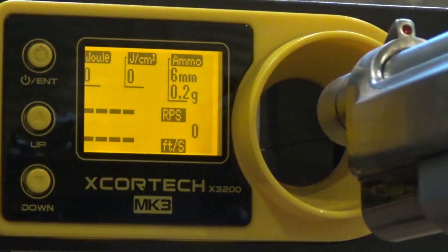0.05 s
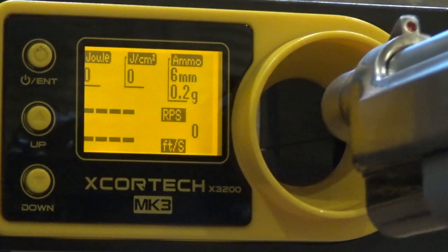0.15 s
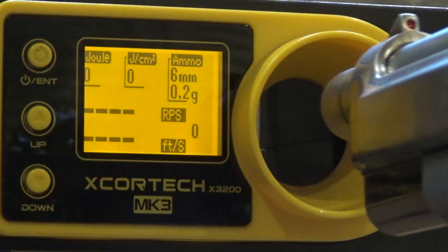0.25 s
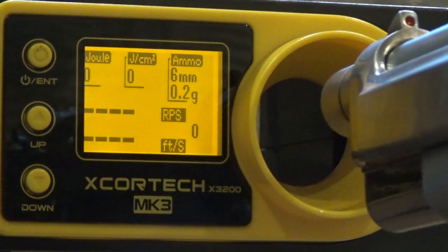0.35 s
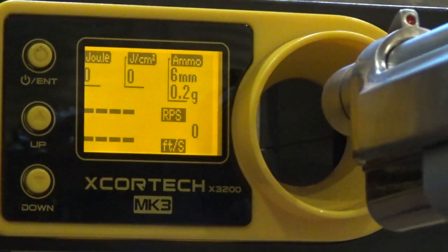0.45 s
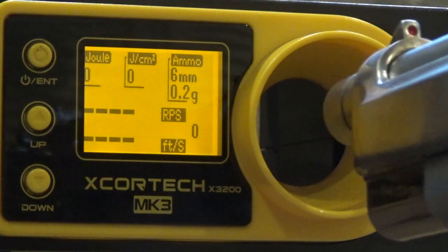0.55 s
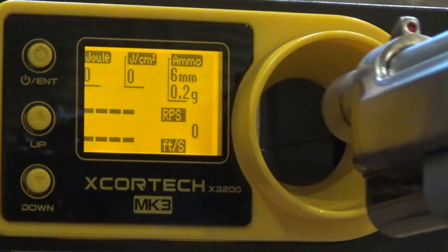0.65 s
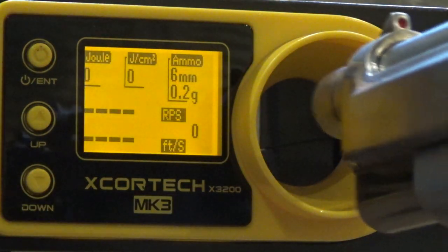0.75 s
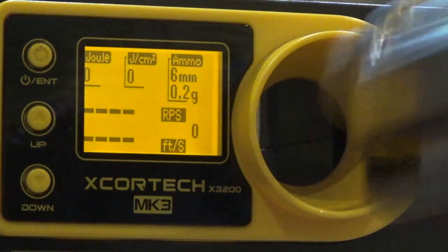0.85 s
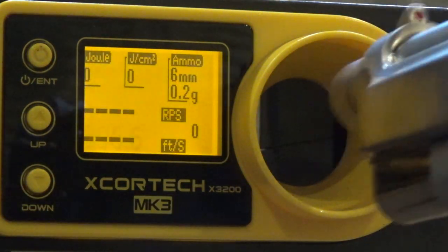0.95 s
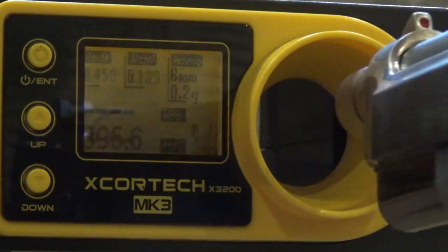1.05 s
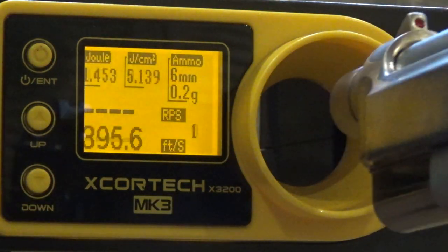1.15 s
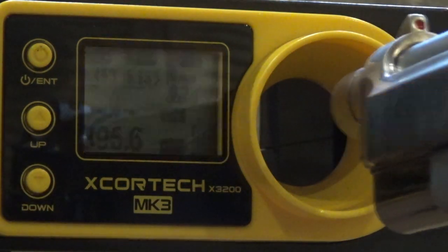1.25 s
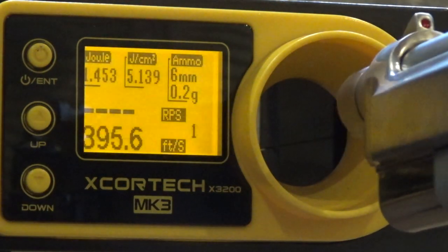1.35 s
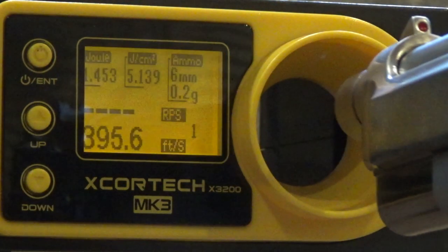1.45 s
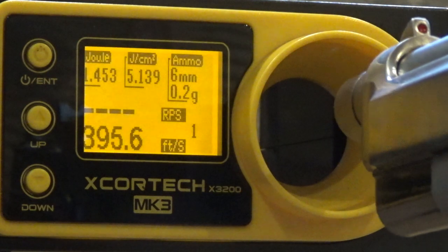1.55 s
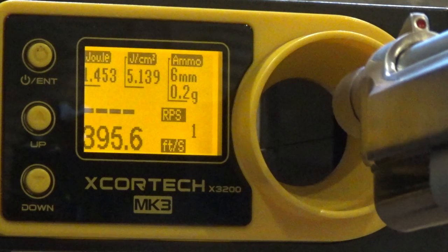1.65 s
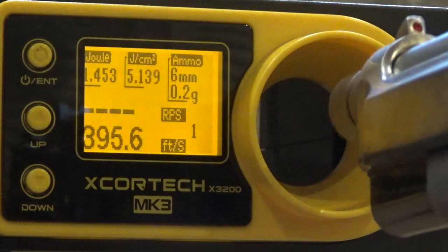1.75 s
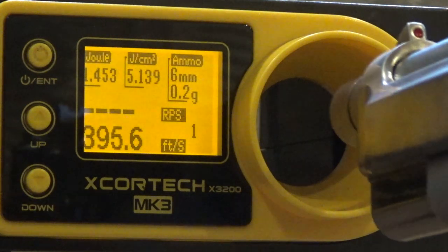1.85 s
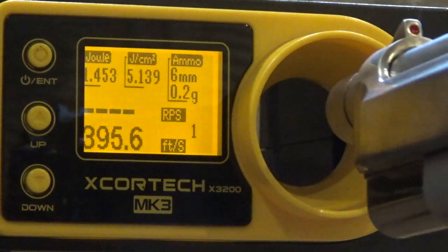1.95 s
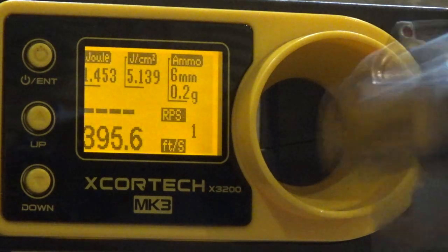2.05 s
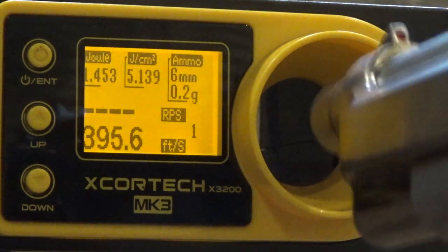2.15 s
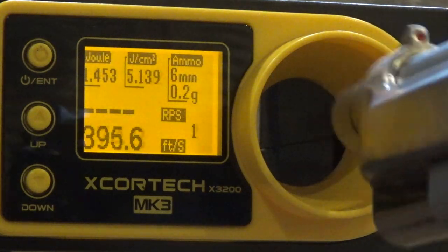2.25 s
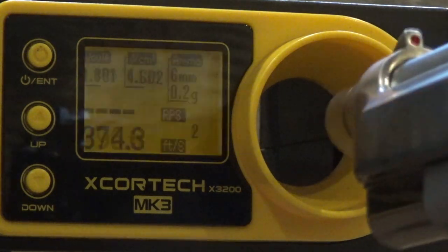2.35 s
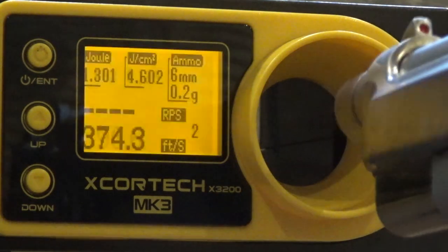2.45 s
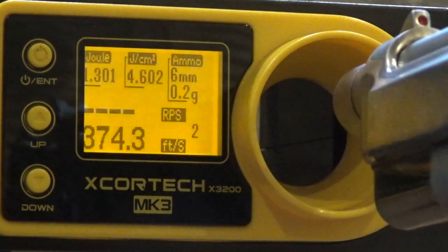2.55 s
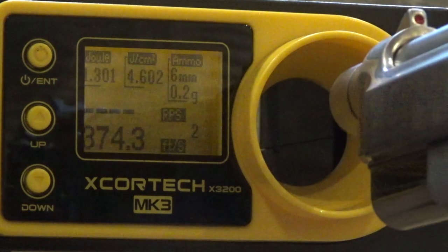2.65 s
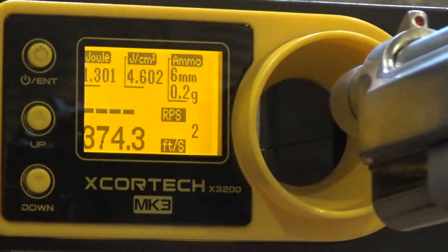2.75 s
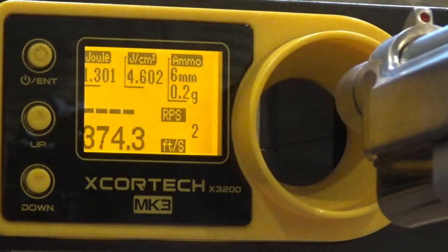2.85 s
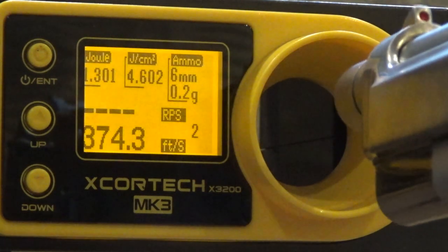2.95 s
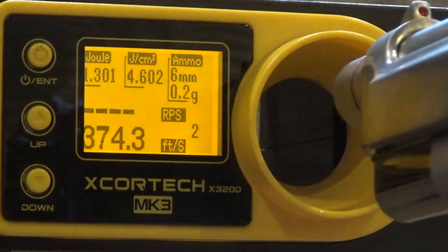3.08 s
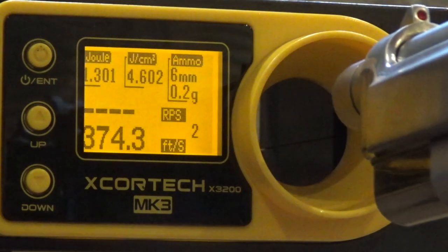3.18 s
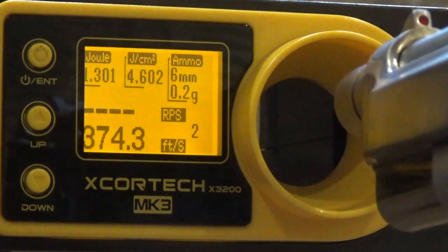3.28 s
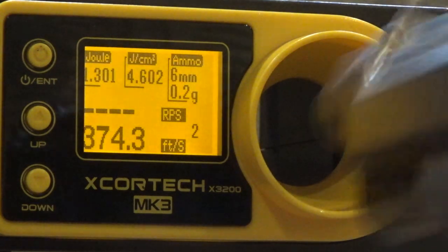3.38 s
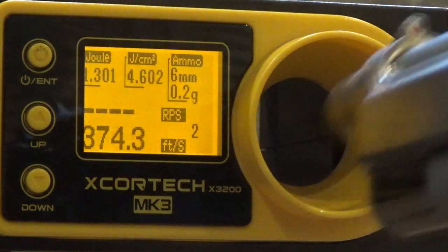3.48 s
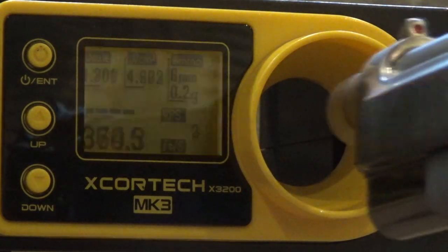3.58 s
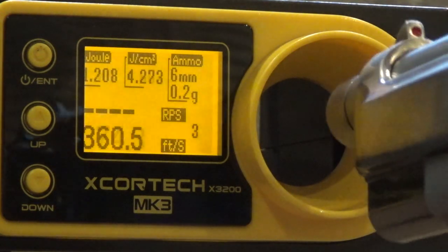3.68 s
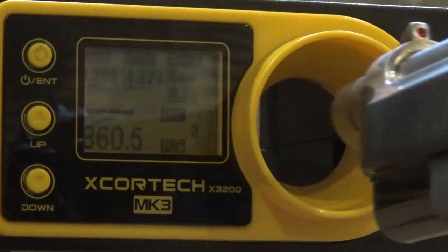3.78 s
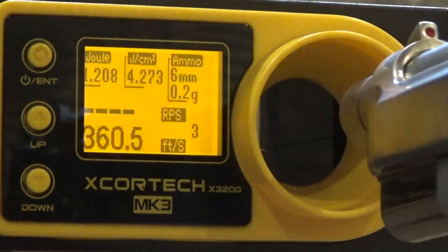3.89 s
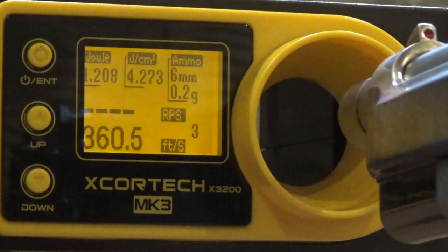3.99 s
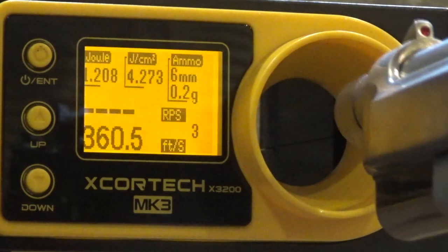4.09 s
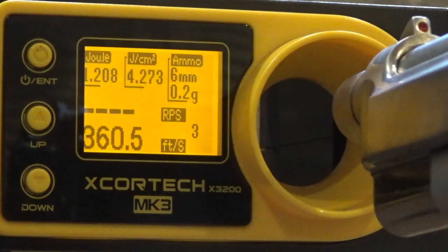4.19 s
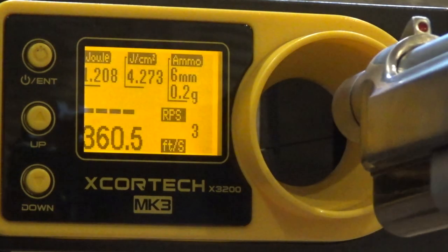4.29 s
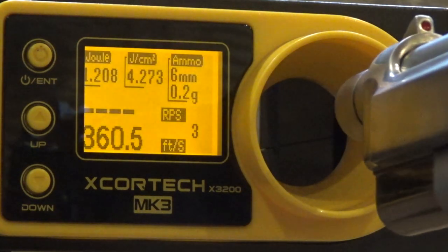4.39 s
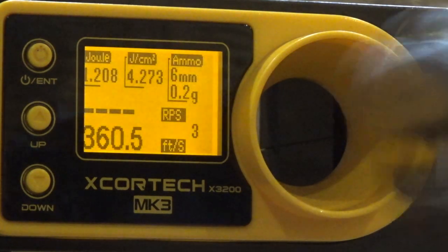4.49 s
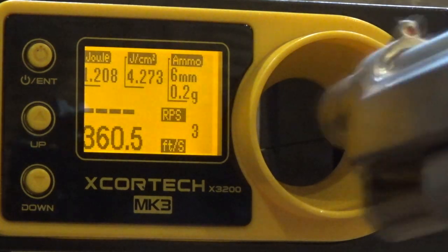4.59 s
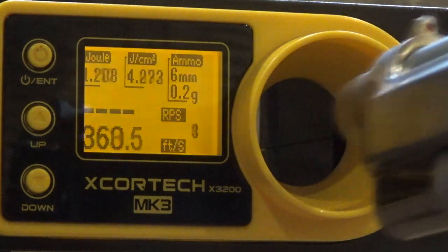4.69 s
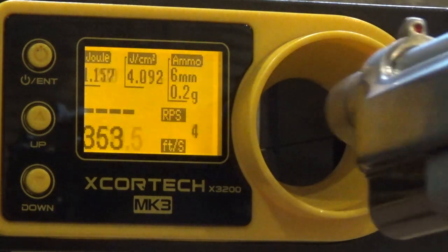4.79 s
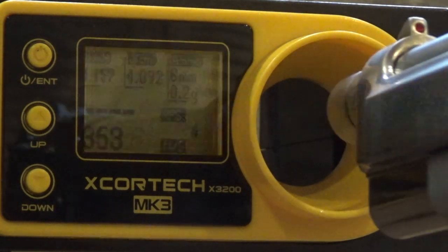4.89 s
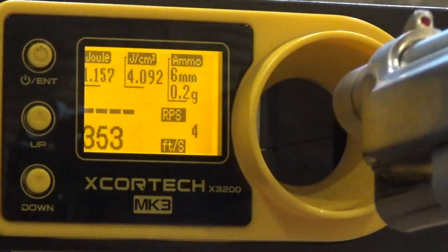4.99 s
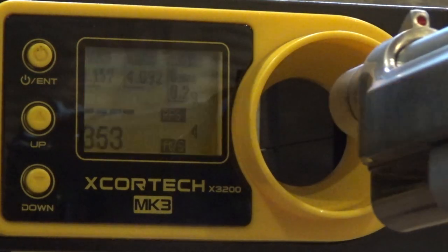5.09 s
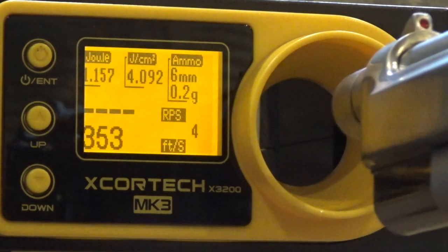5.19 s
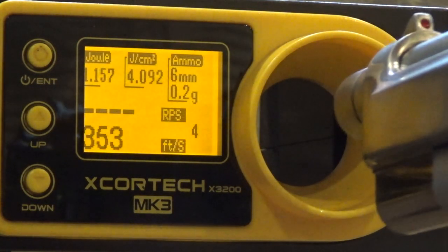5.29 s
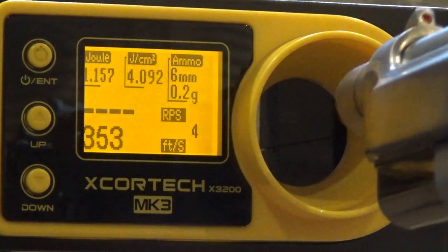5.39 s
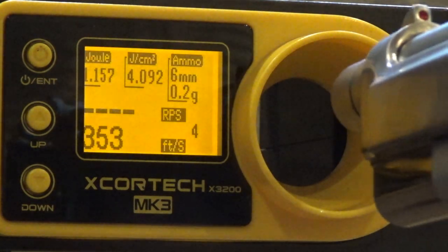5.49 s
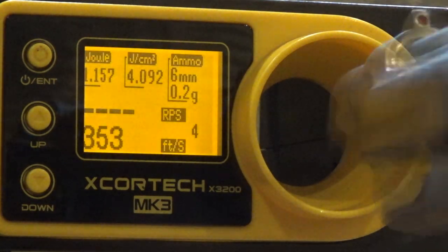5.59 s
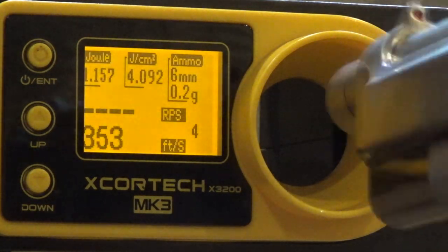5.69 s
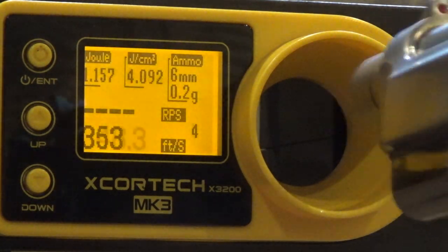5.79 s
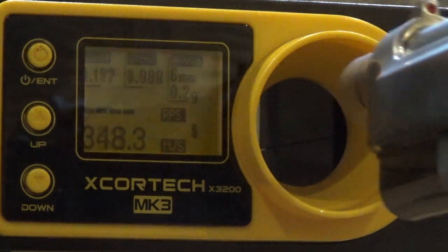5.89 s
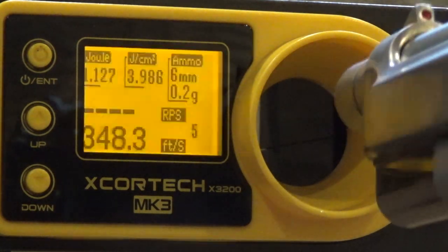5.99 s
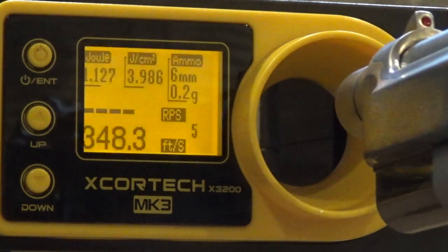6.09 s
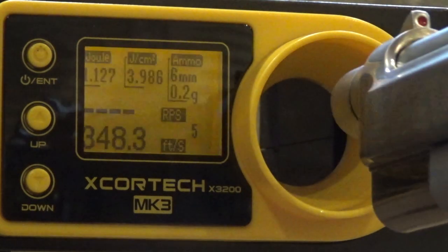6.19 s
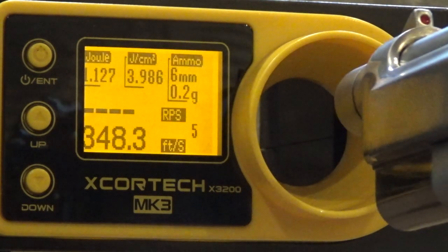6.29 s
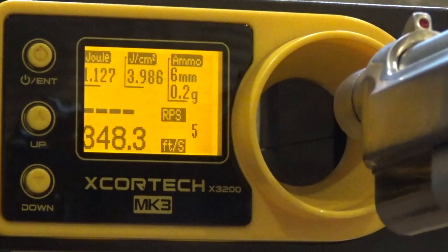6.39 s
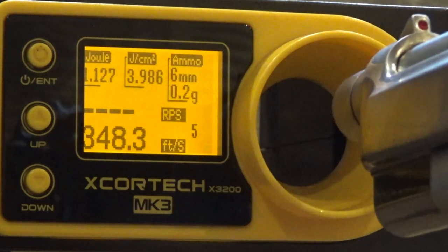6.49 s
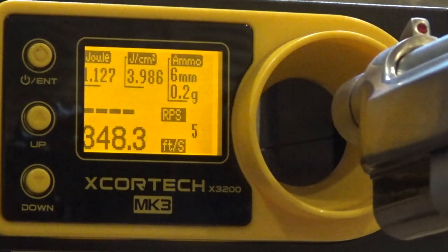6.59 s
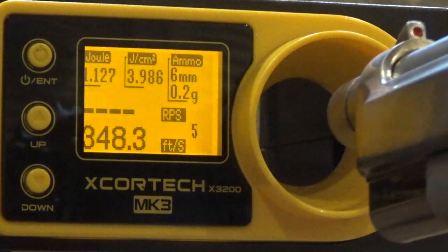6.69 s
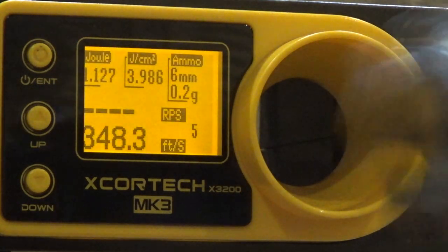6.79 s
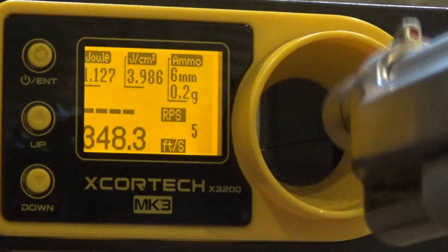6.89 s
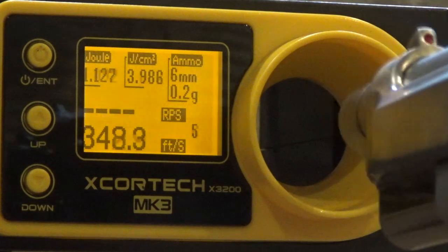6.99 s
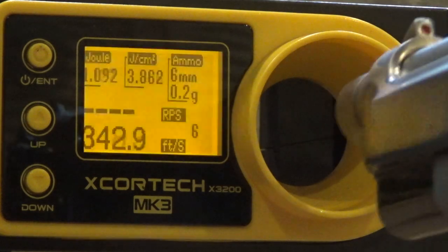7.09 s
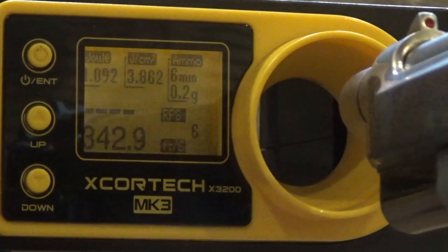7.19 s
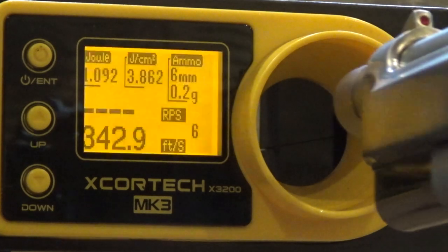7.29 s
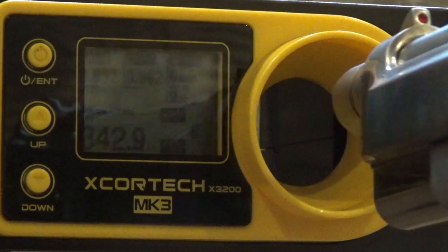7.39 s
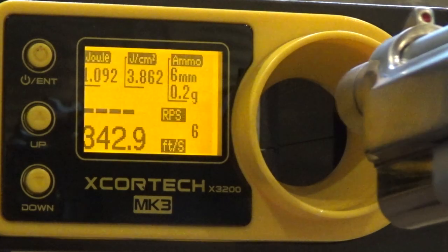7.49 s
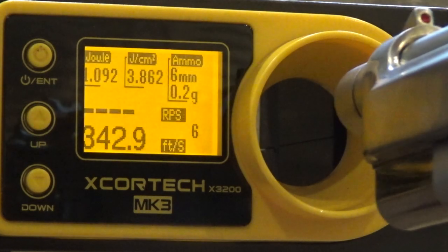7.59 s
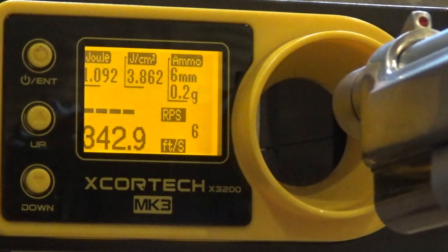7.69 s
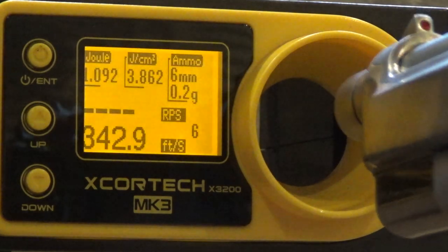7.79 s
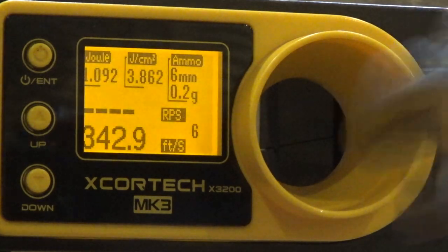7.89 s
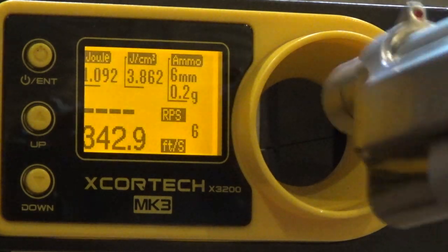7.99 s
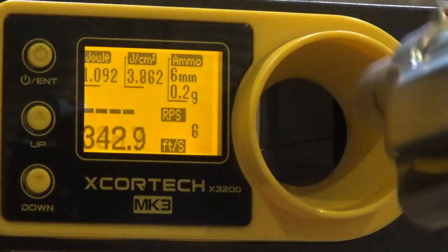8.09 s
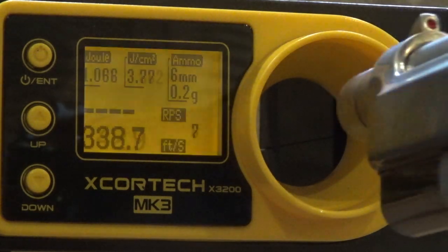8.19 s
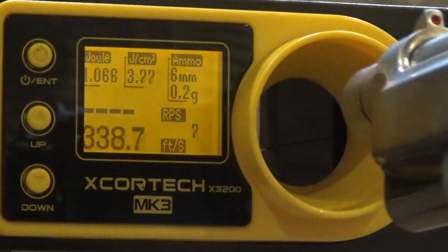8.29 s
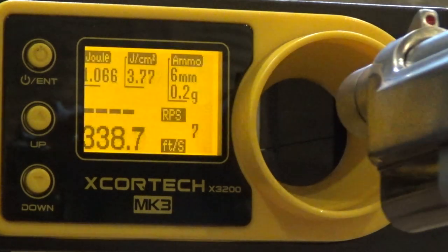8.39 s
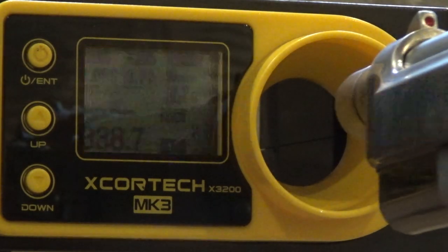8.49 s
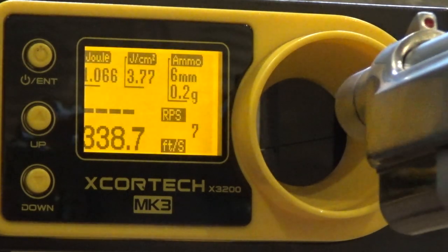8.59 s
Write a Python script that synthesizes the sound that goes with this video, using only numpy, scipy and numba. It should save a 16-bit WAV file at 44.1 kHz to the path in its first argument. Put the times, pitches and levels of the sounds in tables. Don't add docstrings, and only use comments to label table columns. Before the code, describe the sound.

Seven separate shots from a gas airsoft pistol, very close in a small hard room. Each is a sharp, dry crack with a burst of gas, a pellet knock and a metal slide clacking back and forward, then a tiny trigger tick. Short bright reverberation fades into soft hum and faint fan whine. Shots come every 1.1 to 1.3 seconds, and the camera microphone squashes the peaks.

```python
import sys
import numpy as np
from scipy import signal
from scipy.fft import rfft, irfft
from scipy.io import wavfile
from scipy.ndimage import uniform_filter1d
from numba import njit

SR = 44100
rng = np.random.default_rng(int(sys.argv[2]) if len(sys.argv) > 2 else 0)


def transcribe(u):
    v = np.clip(np.atleast_2d(u).T, -1, 1)
    q = np.round(v * 32767).astype(np.int16)
    wavfile.write(sys.argv[1], SR, q)


def invert_db(x):
    u = np.asarray(x, float) / 20
    return 10 ** u


N = 381453
TIME = np.arange(N) / SR

# start_s, puff_on_microphone_db, slide_back_db, gas_into_room_db
SHOTS = [
    (0.8456, -26, -6, 2.5),
    (2.1040, -8, 8.5, 1),
    (3.3769, -5, 10.5, -0.5),
    (4.5039, 1.5, 2, 4),
    (5.6453, 1, -6, 12),
    (6.8144, -1.5, -14, 4.5),
    (7.93, -2, -15, 6.5),
]
# time_before_blast_s, level_db, decay_s
LOCK_CLICKS = [(.0150, -27, .003), (.0133, -23, .0015), (.0108, -20, .0006), (.0060, -20, .0008),
               (.0027, -19, .004)]
# start_s, level_db
TRIGGER_TICKS = [(0.99, -9), (2.2673, -14.5), (3.5369, -14), (4.6686, -14.5), (5.8089, -14.5),
                 (6.979, -15.5), (8.1118, -18)]
# delay_s, level_db
SLIDE_BOUNCES = [(0, 1), (.0036, -3), (.0085, -1.5)]
# delay_s, level_db, left_minus_right_db, top_hz
NEAR_ECHOES = [(.0098, -9, 2, 6000), (.0145, -10, -2, 1500), (.0178, -9, 2, 6000)]

# pitch_hz, level_db, t60_s (time to fall 60 dB)
SLIDE_MODES = [(5650, -11, .025), (5950, -9, .025), (8600, -12, .02), (9900, -6, .015), (10170, -1, .03),
               (10550, 0, .03), (11100, -4, .015), (12300, -9, .015)]
TRAP_MODES = [(421, -6.5, 0.12), (490, -1.5, 0.023), (570, -9.5, 0.18), (1210, -14.5, 0.0037)]
BACKSTOP_MODES = [(600, 0.5, 0.011)]
BARREL_MODES = [(5560, -3, .012), (5800, 0.5, 0.01), (5920, -0.5, 0.013)]

# pitch_hz, level_db (per Hz)
GAS_COLOUR = [(100, -22.5), (300, -2.5), (1000, -9), (2000, -7.5), (4000, -9), (5100, -10), (5800, -3.5),
              (6600, -4), (7400, -9), (8600, -3.5), (10400, 0.5), (12500, -4), (14500, -10), (16000, -13)]
CLACK_COLOUR = [(300, -47.5), (1000, -16.5), (2000, -7.5), (4000, -10), (5800, 0.5), (7400, -5),
                (10400, -2), (13000, 1), (16000, -18)]
HUM_COLOUR = [(15, -34.5), (25, -10), (84, -1.5), (190, 0.5), (335, -1), (363, -0.5), (439, -2.5),
              (677, -3), (734, -2.5), (911, -2), (1560, -8), (2110, -7), (2350, -9), (14800, -16.5),
              (16000, -15)]
STANDING_COLOUR = [(200, -25), (260, -9), (325, -11), (352, 2), (385, -10), (530, -5), (640, -9),
                   (800, -28)]
# pitch_hz, level_db (per Hz)
LOCK_COLOUR = [(300, -40), (1200, -9.5), (3000, -3), (5800, 1.5), (8000, 1), (10400, 4.5), (13000, -5.5),
               (16000, -20.5)]
SLAM_COLOUR = [(1000, -24.5), (4000, -11.5), (7400, -18.5), (10400, -2.5), (13000, 1.5), (16000, -19.5)]
TRIGGER_COLOUR = [(300, -52), (1500, -9.5), (4000, -6.5), (11000, 1.5), (14500, -1), (16500, -4), (19000, 9.5)]
FAN_COLOUR = [(1900, -40.0), (2040, -2.5), (2080, 1.0), (2130, -4.0), (2300, -43)]
LEAK_COLOUR = [(5000, -30.0), (8500, -4), (10500, 5.0), (12500, 3.5), (14000, -42.0)]
# rate_hz, level_db (per Hz)
FAN_WANDER = [(1, -0.5), (6, 2), (15, -31), (40, -92.5)]

# pitch_hz, side_minus_mid_db
HUM_SIDE = [(60, -9), (110, -13.5), (200, -10), (380, -3.5), (700, -1.5), (1290, 0), (2380, -0.5),
            (4400, -5.5), (8120, -9.5), (15000, -21.5)]
# pitch_hz, t60_s, level_db, side_minus_mid_db
ROOM = [(59.9, 0.24, -19, -16), (154, 0.33, -10.5, -17), (284.7, 0.45, -9.5, -14.5),
        (353, 0.51, -19, -17.5), (463, 0.25, -5, -13), (752, 0.36, 5, -10), (1400, 0.39, 1, -8),
        (2850, 0.39, -2, -7.5), (5630, 0.41, -7, -7), (8440, 0.31, -3.5, -8.5), (11000, 0.31, -3.5, -15),
        (16200, 0.16, -3, -28.5)]

SHOT_S, PUFF_DB, SLIDE_BACK_DB, ROOM_GAS_DB = np.transpose(SHOTS)
CHILL = 1 - np.exp(-np.arange(len(SHOT_S)) / 1.2)
CRACK_DB = -7 - 3 * CHILL
KNOCK_DB = 10 - 2.5 * CHILL
BARREL_DB = -8 * CHILL
STANDING_DB = -40 - 5.5 * CHILL
SLAM_DB, SLIDE_CYCLE_S = -8.5, .0562


def pistol():
    gas, clack = noise(GAS_COLOUR), noise(CLACK_COLOUR)
    fire = hits(SHOT_S, CRACK_DB)
    back = hits(SHOT_S + .021, SLIDE_BACK_DB - 15)
    slam = hits(SHOT_S + SLIDE_CYCLE_S, SLAM_DB)
    crack, boom = muzzle_crack(fire, gas, clack), pressure_boom(fire)
    vent, metal = venting_gas(gas), slide_metal(back, slam, clack)
    reset, knock = trigger_reset(), ring(hits(SHOT_S + .033, KNOCK_DB - 29), TRAP_MODES)
    blast = crack + invert_db(-13.5) * boom
    action = hammer_and_valve() + vent + metal + reset + knock + backstop_thud() + microphone_puff()

    slide = click(back * invert_db(19.0) + slam * invert_db(27), CLACK_COLOUR)
    blows = click(hits(SHOT_S, ROOM_GAS_DB + 16.0), GAS_COLOUR)
    blows = blows + slide + invert_db(-33.5) * ring(slide, SLIDE_MODES)
    blows = blows + invert_db(-7.5) * (vent + metal) + knock + boom + reset
    blows = blows + ring(hits(SHOT_S, BARREL_DB), BARREL_MODES)
    return blast, action, blows


def muzzle_crack(fire, gas, clack):
    first = burst(fire * invert_db(10), .0016) * gas
    second = burst(hits(SHOT_S + .0043, CRACK_DB + 8), .0011) * clack
    return first + second


def pressure_boom(fire):
    swing = np.sin(np.linspace(0, 2 * np.pi, int(0.0019 * SR)))
    return invert_db(4.5) * signal.oaconvolve(fire, swing)[:N]


def venting_gas(gas):
    hiss = burst(hits(SHOT_S + 0.0083, CRACK_DB - 0.5), 0.051)
    held_back = burst(hits(SHOT_S + .009, CRACK_DB - 0.5), 0.008)
    return (hiss - .6 * held_back) * gas


def microphone_puff():
    push = signal.oaconvolve(hits(SHOT_S, PUFF_DB - 5.0), np.hanning(int(0.0022 * SR)))[:N]
    return signal.lfilter(*signal.butter(1, 55, "high", fs=SR), push)


def slide_metal(back, slam, clack):
    rattle = burst(back, 0.011) * clack
    landing = slam + hits(SHOT_S + 0.018, CRACK_DB - 2.5)
    bounces = sum(invert_db(db) * np.roll(landing, int(after * SR)) for after, db in SLIDE_BOUNCES)
    rattle = rattle + burst(bounces * invert_db(10.5), 0.0021) * noise(SLAM_COLOUR)
    return invert_db(-4) * rattle + invert_db(-28.5) * ring(rattle, SLIDE_MODES)


def backstop_thud():
    flight_s = .0062 + .0027 * CHILL
    return ring(hits(SHOT_S + flight_s, -11), BACKSTOP_MODES)


def hammer_and_valve():
    clicks = sum(burst(hits(SHOT_S - before, db), decay) for before, db, decay in LOCK_CLICKS)
    return clicks * noise(LOCK_COLOUR)


def trigger_reset():
    tick = hits(*np.transpose(TRIGGER_TICKS))
    return burst(tick * invert_db(7.0), 0.0028) * noise(TRIGGER_COLOUR)


def near_echoes(blast):
    echoes = 0
    for lag, db, pan_db, top_hz in NEAR_ECHOES:
        band = signal.butter(1, [250, top_hz], "band", fs=SR)
        dull = signal.lfilter(*band, np.roll(blast, int(lag * SR)))
        echoes = echoes + dull * invert_db(db + np.array([[pan_db], [-pan_db]]) / 2)
    return echoes


def room(x):
    count = int(SR * .8)
    t, hz = TIME[:count], np.fft.rfftfreq(count, 1 / SR)
    white, tail = rfft(rng.standard_normal((2, count))), 0
    for centre in 40 * 2 ** np.arange(0, 9, 1 / 3):
        octaves_away = abs(np.log2(np.maximum(hz, 1) / centre))
        mid, side = irfft(white * np.maximum(1 - 3 * octaves_away, 0), count)
        side = side * invert_db(on_log(centre, ROOM, column=3))
        t60, level_db = on_log(centre, ROOM, column=1), on_log(centre, ROOM, column=2)
        tail = tail + invert_db(level_db - 60 * t / t60) * np.array([mid + side, mid - side])
    tail = tail * np.clip((t - .006) / 0.033, 0, 1)
    return signal.oaconvolve(x[None], tail, axes=1)[:, :N]


def standing():
    strength = hits(SHOT_S + 0.023, STANDING_DB)
    mid, side = noise(STANDING_COLOUR), invert_db(-15.5) * noise(STANDING_COLOUR)
    return burst(strength, .14) * np.array([mid + side, mid - side])


def background():
    return room_hum() + fan_whine() + gas_leak()


def room_hum():
    mid = noise(HUM_COLOUR)
    hz = np.fft.rfftfreq(N, 1 / SR)
    side = irfft(rfft(noise(HUM_COLOUR)) * invert_db(on_log(hz, HUM_SIDE)), N)
    early_db = 2 * np.exp(-TIME / 3.5)
    dip_db = -5.5 * burst(hits(SHOT_S, 0), 0.5)
    return np.array([mid + side, mid - side]) * invert_db(-65 + early_db + dip_db)


def fan_whine():
    wander_db = 1.5 * noise(FAN_WANDER)
    return invert_db(-82 + wander_db) * noise(FAN_COLOUR)


def gas_leak():
    start_s, rise_s = 7.765, 0.019
    open_valve = np.clip((TIME - start_s) / rise_s, 0, 1) * (TIME < SHOT_S[-1])
    return noise(LEAK_COLOUR) * invert_db(-67) * open_valve


def on_log(hz, table, column=1):
    table = np.array(table, float)
    return np.interp(np.log(np.maximum(hz, 1)), np.log(table[:, 0]), table[:, column])


def noise(colour, count=N):
    spectrum = rfft(rng.standard_normal(count))
    x = irfft(spectrum * invert_db(on_log(np.fft.rfftfreq(count, 1 / SR), colour)), count)
    return x / x.std()


def hits(times, db):
    x = np.zeros(N)
    x[(np.asarray(times) * SR).astype(int)] = invert_db(db)
    return x


def burst(x, decay):
    fall = signal.lfilter([1], [1, -np.exp(-1 / (max(decay, 1e-4) * SR))], x)
    return uniform_filter1d(fall, size=15, origin=7)


def click(x, colour):
    hz = np.linspace(0, SR / 2, 257)
    taps = signal.firwin2(129, hz, invert_db(on_log(hz, colour)), fs=SR)
    return signal.oaconvolve(x, taps / np.sqrt(np.sum(taps ** 2)), "same")


def ring(x, modes):
    t = TIME[:SR]
    body = sum(invert_db(db - 60 * t / t60) * np.sin(2 * np.pi * hz * t) for hz, db, t60 in modes)
    return signal.oaconvolve(x, body)[:N]


def scene():
    blast, action, blows = pistol()
    lean = invert_db(np.array([[.2], [-.2]]))
    direct = (blast + action) * lean
    return direct + near_echoes(blast) + invert_db(-25) * room(blows) + standing() + background()


@njit
def follow(x, attack, release):
    y, e = np.empty(len(x)), 1e-9
    for i in range(len(x)):
        e += (x[i] - e) * (attack if x[i] > e else release)
        y[i] = e
    return y


def limiter(dry):
    attack_s, release_s, ahead_s = 0.002, 0.012, 0.0024
    envelope = follow(abs(dry).max(axis=0), 1 / (attack_s * SR), 1 / (release_s * SR))
    gain = (1 + (envelope / invert_db(-15.5)) ** 3.61) ** (-.85 / 2.68)
    gain = np.roll(gain, -int(ahead_s * SR))
    return .41 * np.tanh(dry * gain / .41)


def band_limit(x):
    return signal.sosfilt(signal.butter(12, 17040, fs=SR, output="sos"), x)


def record(dry):
    top_cut = signal.ellip(8, .3, 45, 15750, fs=SR, output="sos")
    mix = signal.sosfilt(top_cut, limiter(dry))
    return band_limit(mix)


dry = scene()
out = record(dry)
transcribe(out)
```